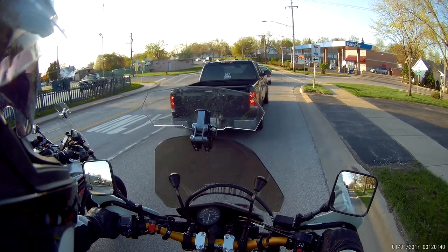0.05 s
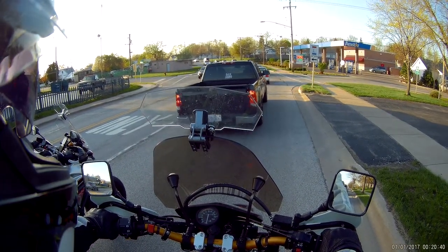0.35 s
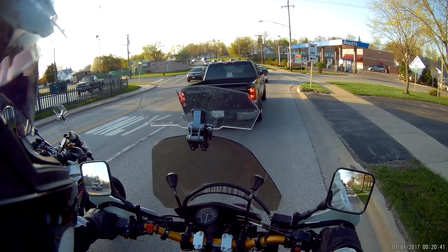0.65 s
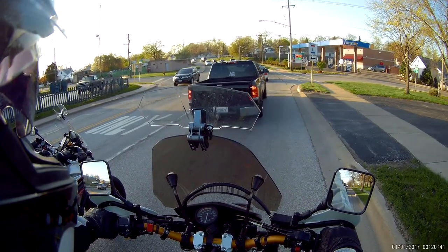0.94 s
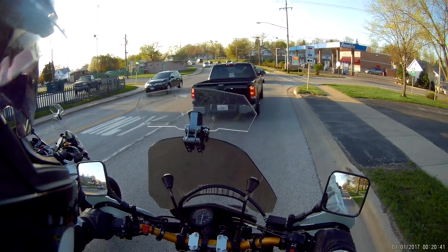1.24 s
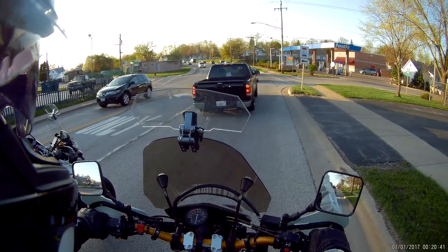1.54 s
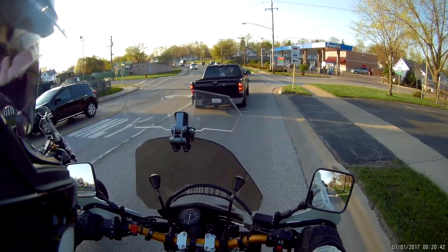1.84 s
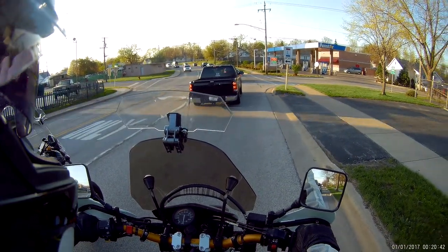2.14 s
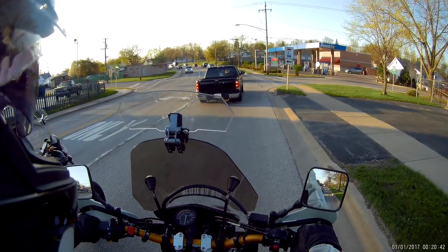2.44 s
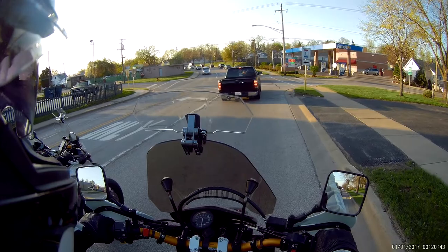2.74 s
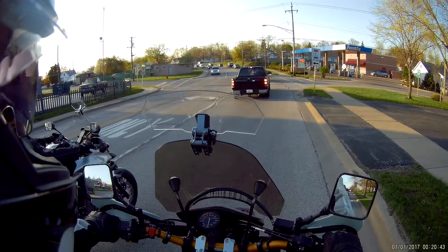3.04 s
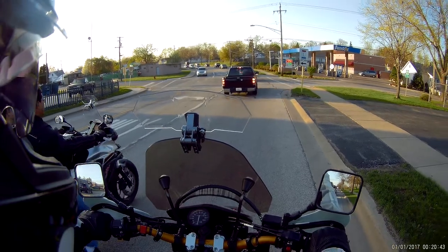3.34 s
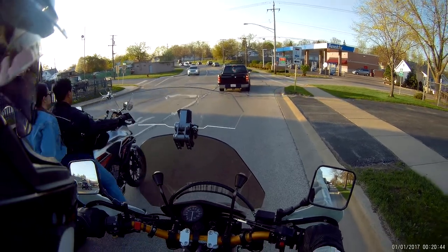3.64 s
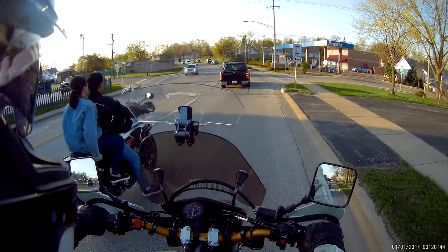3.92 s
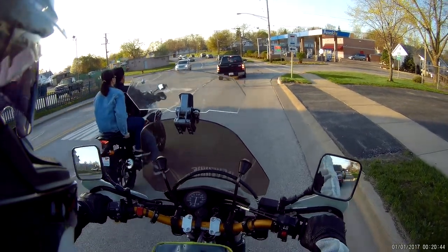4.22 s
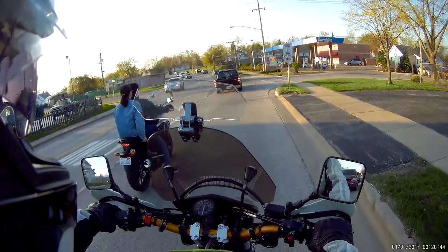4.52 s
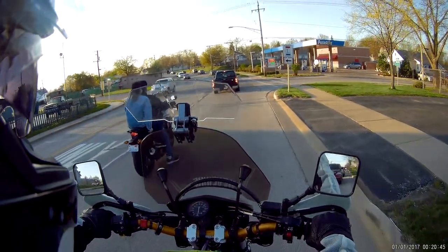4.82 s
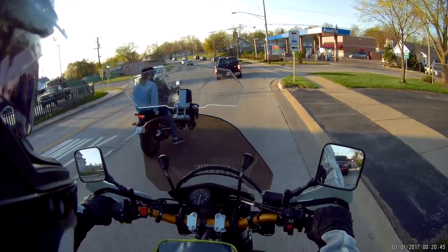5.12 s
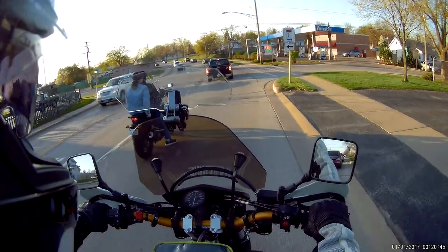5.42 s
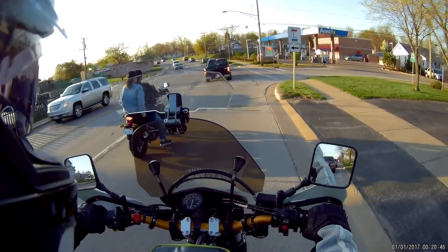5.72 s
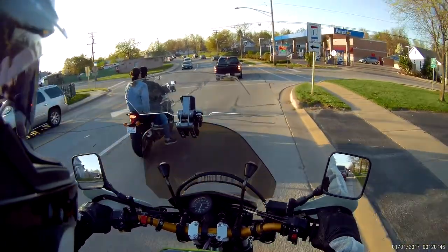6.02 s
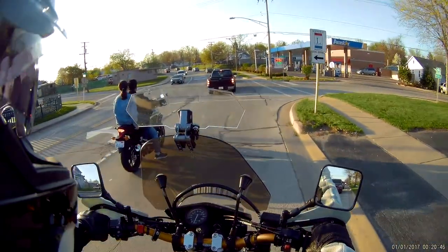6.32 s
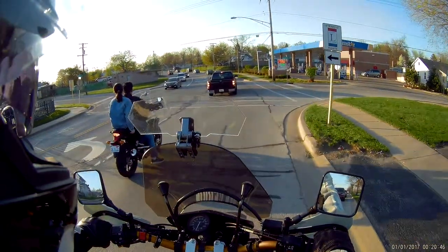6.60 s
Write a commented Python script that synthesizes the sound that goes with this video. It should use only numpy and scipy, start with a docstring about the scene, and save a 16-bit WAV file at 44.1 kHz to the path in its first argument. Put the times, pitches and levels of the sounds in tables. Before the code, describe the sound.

From the rider's position, a motorcycle engine idles with a low, steady thump and light mechanical clatter. Cars swish by the other way, then a few small gear clacks sound as another bike blips its throttle and growls past. The close engine dips, picks up, eases and picks up again as it moves off gently, with more passing cars and distant town traffic behind it.

```python
"""Single-cylinder motorcycle in town, from the rider's seat.

It thumps near idle, then pulls gently: each firing rings the exhaust and rattles the engine.
A V-twin revs beside it and draws ahead with a gear whine. Oncoming cars pass with tyre noise and
engine drone over distant traffic. Thin whistles come and go; a gear goes in with a few clacks."""
import sys
import numpy as np
from scipy import signal
from scipy.fft import rfft, irfft, next_fast_len
from scipy.io import wavfile
from scipy.ndimage import uniform_filter1d

SR = 44100
rng = np.random.default_rng(int(sys.argv[2]) if len(sys.argv) > 2 else 0)


def to_wav(sig):
    """Store sig (one row per channel, or 1-D mono) as 16-bit WAV at the path in sys.argv[1].

    Samples outside -1..1 are clipped; the rate is SR.
    """
    pcm = np.clip(np.atleast_2d(sig), -1, 1) * 32767
    pcm = np.round(pcm).astype(np.int16)
    wavfile.write(sys.argv[1], SR, pcm.T)  # frames by channels


N = 298116

# own engine; sags as the clutch bites, climbs with two throttle pulls: t/s, firing rate/Hz
FIRING_RATE = [(0.0, 14.16), (0.77, 14.84), (0.99, 14.5), (1.84, 14.84), (3.28, 14.89), (3.7, 13.23),
               (4.07, 19.27), (4.56, 15.46), (5.07, 15.34), (5.63, 16.56), (5.84, 20.23), (6.34, 17.7),
               (6.76, 17.06)]
# t/s, opening (0-1)
THROTTLE = [(0, 0), (3.8, 0.25), (4.08, 0.88), (4.6, 1), (5.81, 1), (5.87, 0.4), (6.76, 0.3)]
# louder start easing off: t/s, transition/s, extra thump/dB, extra clatter/dB
EARLY_BOOST = (1.9, 0.29, 2.1, 2.3)
# shut, slight, open throttle: silencer boom and pipe ring (f/Hz, width/Hz, level/dB each),
# plain puff/dB, share of steep front
EXHAUST_STATES = [((62.5, 28, -0.5), (274, 30, -5.8), -8.6, .045), ((74, 47, 2.6), (267, 27, 0),
                  -13.5, .015), ((74, 40, -0.3), (278, 52, -3.8), -13, .034)]
# same states; short pipe echoes that colour each thump, some inverted: delay/s, signed share
PIPE_ECHOES = [
    [(.0071, -0.43), (.0121, 0.21), (.0159, 0.3)],
    [(.0054, 0.29), (.0087, 0.59), (.0146, 0.15)],
    [(.0077, -0.82), (.0130, 0.24), (.0165, 0.25)],
]
# hot gas carries sound faster, raising the ring: t/s, pitch factor
PIPE_HEAT = [(0, 1.0), (3.7, 1.0), (4.15, 1.07), (4.6, 1.0), (5.1, 1.01), (5.6, 1.07), (5.9, 1.08),
             (6.15, 1.04), (6.4, 1.0), (6.76, .975)]
# cases knock harder for the first second, then ease off: t/s, level/dB
KNOCK_BOOST = [(0, 1.5), (0.8, 1.5), (1.2, 0)]
# resonances: f/Hz, width/Hz, relative level/dB
CASE_MODES = [(356, 7, -12.5), (427, 6.3, -1.5), (508, 28, 0.5), (563.3, 17, 0), (738, 23, -6.5),
              (855, 23, -6), (946, 41, -14), (1415, 24, -16)]
FIN_MODES = [(2170, 150, -1), (2720, 200, -2), (3080, 200, -2), (3850, 150, -8), (4200, 240, -4),
             (4960, 280, -6), (5530, 130, -12), (5880, 130, -12), (6200, 180, -13), (6760, 180, -21),
             (7470, 250, -22), (8070, 280, -19), (9660, 500, -25), (10220, 300, -24)]
TWIN_SILENCER_MODES = [(30, 17, -6), (105, 55.6, -1), (275, 180, -21)]
# rasp bands: f/Hz, width/Hz
INTAKE_MODES = [(1260, 64), (1470, 230)]
# V-twin idles, is blipped, pulls past, settles: t/s, cycle rate/Hz
TWIN_RATE = [(0, 12.1), (1.92, 11), (2.08, 20.5), (2.25, 23.6), (2.4, 22.3), (2.59, 18.5), (2.7, 23.2),
             (2.79, 26.8), (2.92, 26.7), (3.08, 25.4), (3.33, 25.2), (3.55, 26.3), (3.76, 26.6),
             (3.98, 25.4), (4.25, 20.7), (4.8, 17.3), (6.76, 17.2)]
# t/s, distance ahead of the rider/m
TWIN_AHEAD = [(0, -0.5), (1.8, 0), (2.1, 1), (2.5, -0.95), (2.85, 1), (3.75, 1.52), (4.3, 3), (5.7, 4),
              (6.76, 2)]
# idling, revved, pulling: cycle rate/Hz, base exhaust level/dB, base hiss level/dB (both at 1 m)
TWIN_STATES = [(12.1, -28, -52.5), (22, -25, -45.5), (26.8, -22.5, -43)]
# gear whine flares with load changes: t/s, half length/s, level/dB
WHINE_FLARES = [(2.47, .14, -58.5), (2.67, 0.04, -62), (2.93, .16, -64), (3.25, .13, -62),
                (3.72, .28, -67.5), (4.12, .14, -68)]
# closest approach t/s, approach/s, tyre roar/dB, tread hiss/dB, hiss pitch factor, song/dB, drone/dB
CAR_PASSES = [(1.301, 0.35, -47.5, -56.5, 1.0, -44.5, -32.5), (1.8, 0.38, -41, -47, 1.0, -43, -30.5),
              (5.48, 0.4, -44, -71.5, 1.0, -47, -46.5), (6.12, 0.33, -43.5, -56.5, 1.12, -54.5, -38.5)]
# tread block song: f/Hz, relative level/dB
TREAD_TONES = [(860, -1.5), (1010, -2.5)]
# start/s, end/s, f/Hz, level/dB
WHISTLES = [(0, 1.6, 6530, -77), (4.3, 5.8, 6130, -77), (4.72, 5.0, 4994, -70), (5.8, 7.0, 6200, -72.5)]
# t/s, level before filtering/dB
GEAR_CLACKS = [(2.029, -47), (2.078, -45.5), (2.092, -45), (2.127, -47), (2.139, -47.5)]
# noise spectra: f/Hz, relative level/dB
GAS_SPECTRUM = [(120, -31), (250, 0.5), (390, -3.5), (520, -5.5), (720, -11.5), (880, -12), (1250, -14),
                (1900, -28), (2800, -28.5), (4200, -38.5), (5200, -44.5), (7000, -60.5), (10000, -60.5),
                (15000, -70)]
VALVE_SPECTRUM = [(300, 8), (1000, 4.5), (2000, -9), (4800, -22), (7500, -39), (15000, -63.5)]
TWIN_HISS_SPECTRUM = [(150, -2.5), (380, -4), (530, 18.5), (720, -3.5), (1150, 9), (1500, 3.5), (1900, 7),
                      (2500, 0), (3400, -6), (4500, -6.5), (5500, -15.5), (7000, -67), (10500, -74),
                      (15000, -72.5)]
TRAFFIC_SPECTRUM = [(15, -10), (45, -11.5), (90, -3.5), (170, -4.5), (300, -14.5), (420, -14), (850, -14.5),
                    (1500, -27.5), (2700, -48), (3600, -53), (5400, -48), (7000, -56.5), (10000, -63.5),
                    (15000, -68.5)]
TYRE_ROAR_SPECTRUM = [(100, -10.5), (400, -11.5), (680, -4.5), (820, 7), (1040, 3), (1250, -5), (2500, -25),
                      (6000, -75), (15000, -66.5)]
TREAD_HISS_SPECTRUM = [(700, -14.5), (1300, -7), (1700, 7), (2250, 2.5), (2700, 8.5), (3300, -2.5),
                       (3900, -10), (5300, -15.5), (7000, -30.5), (15000, -47.5)]
CAR_DRONE_SPECTRUM = [(30, -41.5), (100, -22.5), (120, -8), (135, -2.5), (150, -24.5), (166, -1.5),
                      (185, -29.5), (208, -7), (235, -35.5), (260, -12), (320, -21), (3000, -120)]


def undb(db):
    """Decibels to gain."""
    return 10 ** (np.asarray(db) / 20)


def level(x, db):
    """Scale to an rms level."""
    return x * undb(db) / np.sqrt(np.mean(x ** 2))


def curves(table):
    """Each column after t/s, at every sample."""
    times_s, *columns = np.transpose(table)
    return [np.interp(np.arange(N) / SR, times_s, column) for column in columns]


def shape(x, response):
    """Filter by a function of f/Hz."""
    size = next_fast_len(N + SR // 2)
    f = np.maximum(np.fft.rfftfreq(size, 1 / SR), 1e-3)
    return irfft(rfft(x, size) * response(f), size)[:N]


def colour(x, spectrum):
    """Filter by a spectrum table, to rms 1."""
    hz, db = np.transpose(spectrum)
    return level(shape(x, lambda f: undb(np.interp(np.log(f), np.log(hz), db))), 0)


def noise(spectrum):
    """Coloured noise, rms 1."""
    return colour(rng.standard_normal(N), spectrum)


def resonance(f, hz, width_hz):
    """One resonance, gain 1 at its centre."""
    return 1 / (1 + 1j * (f * f - hz * hz) / (f * width_hz))


def ring_modes(x, modes, order):
    """Drive parallel resonances, each cascaded `order` times."""
    return shape(x, lambda f: sum(undb(db) * resonance(f, hz, width) ** order for hz, width, db in modes))


def walk(rate_hz):
    """Smooth random drift, spread near 1."""
    hold = max(int(SR / rate_hz), 1)
    steps = np.repeat(rng.standard_normal(N // hold + 1), hold)
    return 1.3 * uniform_filter1d(uniform_filter1d(steps, hold), hold)[:N]


def narrow_band(phase_rad, spread_hz):
    """Tone spread into a band by wandering strength and phase."""
    return (np.sin(phase_rad) * walk(spread_hz) + np.cos(phase_rad) * walk(spread_hz)) / np.sqrt(2)


def impulses(cycles, scatter_db):
    """One impulse of random strength per whole cycle."""
    at = np.flatnonzero(np.diff(np.floor(cycles)))
    kicks = np.zeros(N)
    kicks[at] = undb(scatter_db * rng.standard_normal(len(at)))
    return kicks


def swell(cycles, lead, depth):
    """One hump per cycle, peaking `lead` cycles before the exhaust puff."""
    return np.exp(depth * np.cos(2 * np.pi * (cycles + lead)) - depth ** 2 / 4)


def exhaust_response(f, state, echoes, heat, puff_s=0.00086, crack_hz=553):
    """One gas puff runs back and forth in the pipe and swells the silencer's two chambers."""
    (boom_hz, boom_width_hz, boom_db), (ring_hz, ring_width_hz, ring_db), puff_db, crack_share = state
    area = puff_s * SR * np.sqrt(2 * np.pi)
    puff = np.exp(-.5 * (2 * np.pi * f * puff_s) ** 2)
    crack = crack_share * (f / crack_hz) ** 2 * np.exp(1 - (f / crack_hz) ** 2)
    silencer = undb(boom_db) * resonance(f, boom_hz, boom_width_hz) ** 2
    pipe = undb(puff_db) + undb(ring_db) * resonance(f / heat, ring_hz, ring_width_hz)
    returns = sum(share * np.exp(-2j * np.pi * f * delay_s / heat) for delay_s, share in echoes)
    return area * (puff * silencer + (puff + crack) * pipe * (1 + returns))


def exhaust_thumps(kicks, throttle, octaves, boom_edge_hz=100, boom_db_per_octave=-9.5):
    """Each firing sounds the pipe at the current throttle and heat; the boom thins with speed."""
    size, lead = 8192, 256
    f = np.maximum(np.fft.rfftfreq(size, 1 / SR), 1e-3)
    heat, = curves(PIPE_HEAT)
    out = np.zeros(N + size)
    for at in np.flatnonzero(kicks):
        shares = np.maximum(1 - np.abs(2 * throttle[at] - np.arange(len(EXHAUST_STATES))), 0)
        response = sum(share * exhaust_response(f, state, echoes, heat[at])
                       for share, state, echoes in zip(shares, EXHAUST_STATES, PIPE_ECHOES) if share)
        out[at:at + size] += kicks[at] * np.roll(irfft(response), lead)
    thumps = out[lead:lead + N]
    boom = shape(thumps, lambda f: 1 / (1 + (f / boom_edge_hz) ** 4))
    return thumps + boom * (undb(boom_db_per_octave * octaves) - 1)


def gas_rush(cycles, throb):
    """Gritty gas noise throbs each cycle, treble ahead of the puff."""
    grit = noise(GAS_SPECTRUM) * undb(2.2 * walk(250) + 0.8 * walk(13))
    low = shape(grit, lambda f: 1 / (1 + (f / 1700) ** 4))
    treble = (grit - low) * swell(cycles, lead=.125, depth=0.95 * throb)
    return undb(-40.5) * (low * swell(cycles, lead=0.0044, depth=throb) + treble)


def piston_slap(cycles, decay_s=.009):
    """The piston knocks on the bore as the charge fires."""
    slaps = shape(impulses(cycles + .2, scatter_db=3.0), lambda f: 1 / (1 + 2j * np.pi * f * decay_s))
    return level(shape(slaps * rng.standard_normal(N), lambda f: resonance(f, 930, 270) ** 2), -56.0)


def engine_rattle(cycles, throttle, decay_s=0.0066):
    """Combustion and a valve strike the cases before the puff; the valve seats after it."""
    blows = impulses(cycles + .19, scatter_db=1.0)
    blows += 0.47 * impulses(cycles + 0.091, scatter_db=1.7)
    blows += 0.7 * impulses(cycles - .24, scatter_db=1.0)
    spray = shape(blows, lambda f: 1 / (1 + 2j * np.pi * f * decay_s)) * rng.standard_normal(N)
    valves = undb(-53.5 + 2.7 * throttle) * colour(spray, VALVE_SPECTRUM)
    blunt_blows = shape(level(blows, 0) + level(spray, -1), lambda f: 1 / (1 + (f / 1600) ** 4))
    cases = level(ring_modes(blunt_blows, CASE_MODES, order=1), -41.5)
    boost_db, = curves(KNOCK_BOOST)
    slack = 1 - 0.66 * throttle  # loose parts rattle most off load
    return (cases + piston_slap(cycles)) * undb(boost_db) * slack + valves


def cooling_fins(cycles, throttle, throb):
    """Valve-gear chatter rings fins and covers, in pulses that deepen under load."""
    chatter = rng.standard_normal(N) * undb(3.4 * walk(300)) * swell(cycles, lead=0.18, depth=1.2 * throb)
    return level(ring_modes(chatter, FIN_MODES, order=2), -64.5) * undb(-2.2 * throttle)


def intake_rasp(cycles, throttle):
    """The intake rasps in two bands, pulsing each cycle, as the throttle opens."""
    rasp = shape(rng.standard_normal(N), lambda f: sum(resonance(f, *mode) ** 2 for mode in INTAKE_MODES))
    return level(rasp, -53.0) * throttle ** 3 * swell(cycles, lead=0.05, depth=1.5)


def airbox(cycles, throttle):
    """On open throttle a gulp of air rings the airbox just before each thump."""
    gulps = -impulses(cycles + 0.1002, scatter_db=2.5) * throttle ** 2
    return level(shape(gulps, lambda f: resonance(f, 265, 110) / (1 + (f / 450) ** 2)), -41.0)


def own_bike(idle_hz=14.7, throb_shut=.42, throb_open=.95):
    """Single cylinder: one thump per firing; with speed, thumps gain and clatter recedes."""
    rate_hz, = curves(FIRING_RATE)
    throttle, = curves(THROTTLE)
    cycles = .198 + np.cumsum(rate_hz) / SR
    octaves = np.log2(rate_hz / idle_hz)
    ease_s, transition_s, extra_thump_db, extra_clatter_db = EARLY_BOOST
    early = (1 - np.tanh((np.arange(N) / SR - ease_s) / transition_s)) / 2
    thump_db = -2.5 + 6.5 * octaves + extra_thump_db * early
    clatter_db = -0.58 - 2.5 * octaves + extra_clatter_db * early
    throb = throb_shut + (throb_open - throb_shut) * throttle ** 2
    kicks = impulses(cycles, scatter_db=0.85) * undb(thump_db)
    clatter = gas_rush(cycles, throb) + intake_rasp(cycles, throttle)
    clatter += engine_rattle(cycles, throttle) + cooling_fins(cycles, throttle, throb)
    return exhaust_thumps(kicks, throttle, octaves) + clatter * undb(clatter_db) + airbox(cycles, throttle)


def v_twin(gap_cycles=.4375, side_m=1.28, tailpipe_behind_m=0.79, bark_db=1.5, bark_hz_per_s=46):
    """Uneven firing pairs growl in the silencer, louder as it pulls and nears, with hiss and whine."""
    rate_hz, = curves(TWIN_RATE)
    ahead_m, = curves(TWIN_AHEAD)
    engine_m = np.hypot(ahead_m, side_m)
    tailpipe_m = np.hypot(ahead_m - tailpipe_behind_m, side_m)
    state_hz, *levels_db = np.transpose(TWIN_STATES)
    exhaust_gain, hiss_gain = (undb(np.interp(rate_hz, state_hz, db)) for db in levels_db)
    accel_hz_per_s = uniform_filter1d(np.gradient(rate_hz) * SR, size=SR // 10)
    bark = undb(bark_db * np.maximum(np.tanh(accel_hz_per_s / bark_hz_per_s), 0))
    cycles = np.cumsum(rate_hz * (1 + .006 * walk(30))) / SR
    puffs = impulses(cycles, scatter_db=1.7) + impulses(cycles - gap_cycles, scatter_db=1.7)
    growl = level(ring_modes(puffs, TWIN_SILENCER_MODES, order=2), 0)
    hiss = noise(TWIN_HISS_SPECTRUM) * (1 + 0.35 * np.cos(4 * np.pi * cycles))
    return growl * exhaust_gain * bark / tailpipe_m + hiss * hiss_gain / engine_m + gear_whine(cycles)


def distant_traffic():
    """Low hum, level drifting slightly."""
    return undb(-38.0 + walk(3.7)) * noise(TRAFFIC_SPECTRUM)


def whistles(fade_s=0.14):
    """Thin, airy whistles come and go high above the engine."""
    t = np.arange(N) / SR
    out = 0
    for start_s, end_s, hz, db in WHISTLES:
        gate = (np.tanh((t - start_s) / fade_s) - np.tanh((t - end_s) / fade_s)) / 2
        out += undb(db) * gate * narrow_band(2 * np.pi * hz * t, spread_hz=370)
    return out


def oncoming_cars(recede_share=0.53, doppler_share=.012):
    """Tyres and engines swell, then fade faster; the tread blocks' song sinks in passing."""
    t = np.arange(N) / SR
    roar, drone = noise(TYRE_ROAR_SPECTRUM), noise(CAR_DRONE_SPECTRUM)
    out = 0
    for closest_s, approach_s, roar_db, hiss_db, pitch, song_db, drone_db in CAR_PASSES:
        along = (t - closest_s) / (approach_s * np.where(t < closest_s, 1, recede_share))
        nearness = 1 / (1 + along ** 2)
        hiss = noise([(hz * pitch, db) for hz, db in TREAD_HISS_SPECTRUM])
        doppler_s = np.cumsum(1 - doppler_share * along * np.sqrt(nearness)) / SR
        tones = sum(undb(db) * narrow_band(2 * np.pi * hz * doppler_s, spread_hz=85)
                    for hz, db in TREAD_TONES)
        song = undb(song_db) * nearness * level(tones, 0)
        out += nearness * (undb(roar_db) * roar + undb(hiss_db) * hiss + song + undb(drone_db) * drone)
    return out


def gear_clacks(rise_s=.003):
    """A gear goes in with a few gritty metal clacks."""
    t = np.arange(N) / SR
    envelope = 0
    for start_s, db in GEAR_CLACKS:
        age = np.maximum(t - start_s, 0) / rise_s
        envelope += undb(db) * age * np.exp(1 - age)
    return shape(envelope * rng.standard_normal(N), lambda f: resonance(f, 2700, 4200) ** 2)


def gear_whine(cycles, teeth_per_cycle=206):
    """The V-twin's mesh tone, spread into a band by uneven tooth contact, in brief flares."""
    t = np.arange(N) / SR
    flares = sum(undb(db) * np.exp(-((t - peak_s) / half_s) ** 2) for peak_s, half_s, db in WHINE_FLARES)
    mesh = narrow_band(2 * np.pi * teeth_per_cycle * cycles, spread_hz=760)
    return mesh * undb(1.5 * walk(25)) * flares


def scene():
    """Mono sum at the rider."""
    return (own_bike() + v_twin() + distant_traffic() + oncoming_cars() + gear_clacks() + whistles())[None]


def record(dry):
    """A small microphone loses the deepest bass and the top."""
    low_hz, top_hz = 33, 15000
    thinned = signal.sosfilt(signal.butter(2, low_hz, "high", fs=SR, output="sos"), dry)
    return signal.sosfilt(signal.ellip(8, .2, 70, top_hz, fs=SR, output="sos"), thinned)


dry = scene()
out = record(dry)
to_wav(out)
```